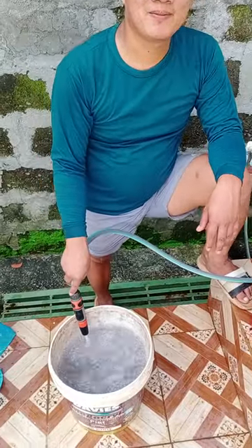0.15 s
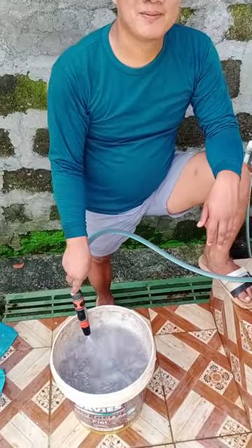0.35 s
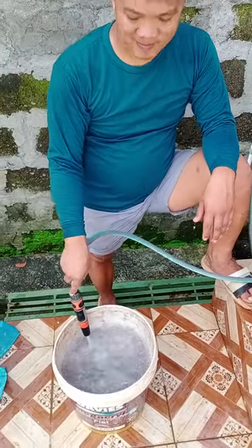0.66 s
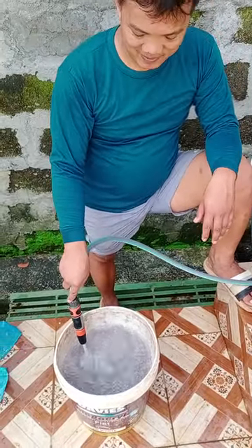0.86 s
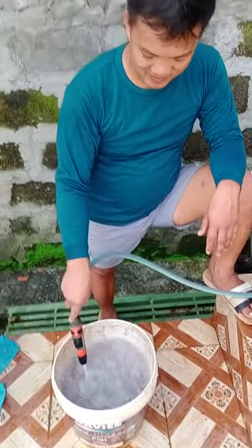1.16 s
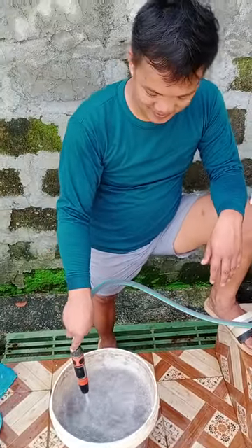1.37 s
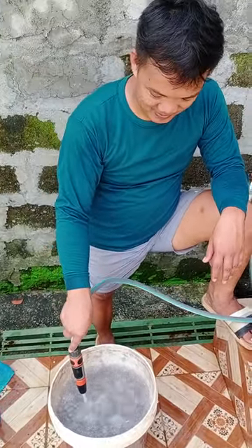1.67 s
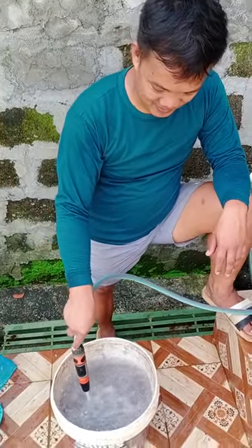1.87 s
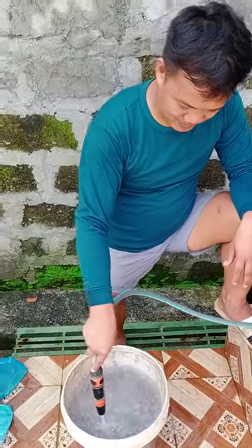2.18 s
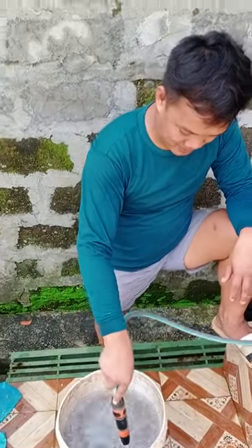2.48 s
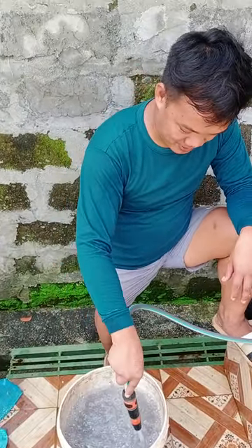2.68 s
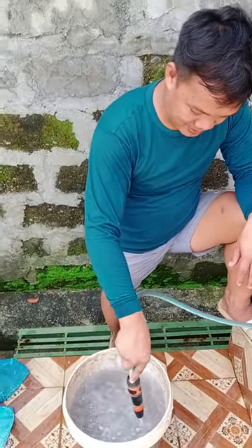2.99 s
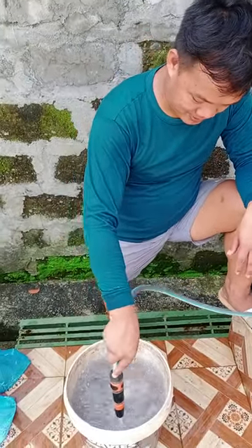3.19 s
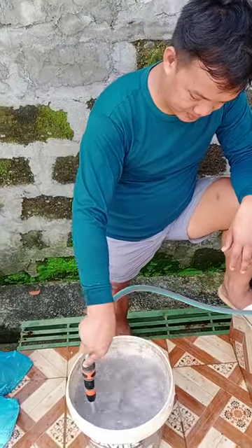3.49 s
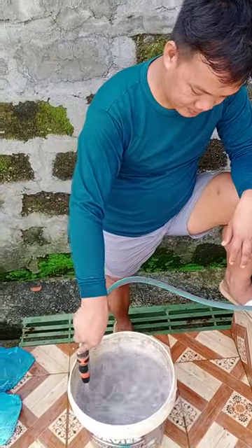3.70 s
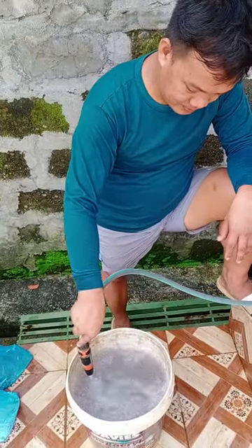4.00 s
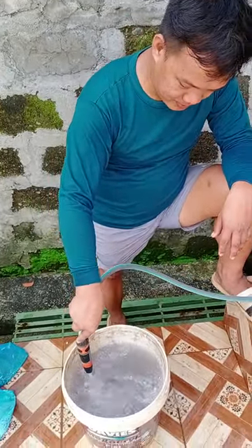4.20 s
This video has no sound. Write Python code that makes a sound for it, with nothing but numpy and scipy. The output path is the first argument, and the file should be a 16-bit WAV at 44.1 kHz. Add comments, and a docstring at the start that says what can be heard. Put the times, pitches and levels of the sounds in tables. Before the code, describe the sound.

For about 4.3 seconds a hose jet churns water in a plastic bucket, close and continuous. The main sound is a dense bright fizz, mostly from 2 to 6 kHz with airy mist above, flickering and crackling with tiny bubbles. It surges near 0.5 seconds, turns brighter and thinner from about 0.8, and surges again near 2.8. Beneath it, weaker frothy ringing around 1.2 to 1.6 kHz and a hollow bucket tone near 500 to 600 Hz gurgle unevenly, with froth strongest around 2.7. Soft low glugs rise at 0.26 and between 1.2 and 2.0. Sharp millisecond plinks dot the whole stretch, clearest at 1.8, 3.35, 3.84 and 4.29. A faint low wash lies underneath; a distant engine's low beating hum swells around 2.5 seconds, then fades. Outdoor tiled yard, hand-held mono microphone above, little reverberation, dull above 16 kHz. The water is still running at the end.

```python
"""Hose jet in a plastic bucket

A hose jet churns the water in a bucket on a tiled yard, heard from above by a hand-held mono microphone.
Noise and tiny ringing bubbles make the fizz; froth and the air in the bucket ring at a few pitches.
Single bubbles glug and plink as short rising tones, over a low wash of noise.
A far-away engine idles as four beating tones; both output channels are the same."""
import sys
import numpy as np
from scipy import signal
from scipy.io import wavfile
from scipy.ndimage import uniform_filter1d

SR = 44100
rng = np.random.default_rng(int(sys.argv[2]) if len(sys.argv) > 2 else 0)


def wav_out(sig):
    """Save sig, one row per channel (or a flat mono array), as 16-bit PCM at SR to the path in sys.argv[1]."""
    wavfile.write(sys.argv[1], SR, np.round(np.clip(np.atleast_2d(sig).T, -1, 1) * 32767).astype(np.int16))


N = 191333  # length in samples
EDGE_HZ = 15760  # upper limit of the sound


def gain_of(db):
    """Turns decibels into a factor."""
    return 10 ** (np.asarray(db) / 20)


def evened(x):
    """Scales to an rms (average strength) of 1."""
    return x / np.sqrt(np.mean(x ** 2) + 1e-20)


def read(points, hz):
    """Reads a spectrum table at any pitch, joining its points on a log-frequency axis."""
    f, value = np.transpose(points)
    return np.interp(np.log(hz + 1), np.log(f + 1), value)


def columns(rows, t):
    """Reads every column of a time table at times t, joining its points by straight lines."""
    s, *rest = np.transpose(rows)
    return [np.interp(t, s, c) for c in rest]


def wander(t, long_s):
    """Slow random drift of rms 1 at times t."""
    size = max(1, round(long_s / (t[1] - t[0])))
    noise = rng.standard_normal(len(t))
    return evened(uniform_filter1d(uniform_filter1d(noise, size), size))


def add(mix, s, sound):
    """Mixes a sound in at s seconds."""
    part = mix[round(s * SR):][:len(sound)]
    part += sound[:len(part)]


def peak_db(hz, centre_hz, width_hz):
    """A resonance curve: 0 dB at the centre, falling on both sides."""
    return -10 * np.log10(1 + (2 * (hz - centre_hz) / width_hz) ** 2)


def band(colour_db, level_db):
    """Power at each pitch with this colour, adding up to the level."""
    power = gain_of(colour_db) ** 2
    return power / power.mean(0) * gain_of(level_db) ** 2


def bubbles(low_hz, high_hz, per_s, cycles, spread_db, count):
    """Short rising rings of many sizes, each size on its own random train; equal power per Hz."""
    out = np.zeros(N)
    for hz in np.geomspace(low_hz, high_hz, count):
        turn = np.arange(int(4 * cycles * SR / hz)) * hz / SR
        swell = turn / (turn + 2.3) * np.exp(-turn / cycles)
        ring = swell * np.sin(2 * np.pi * turn * (1 + 0.00406 * turn))
        when, size = rng.random(N), rng.exponential(1, N)
        train = (when < per_s / count / SR) * gain_of(spread_db * np.minimum(size, 4))
        # the sizes are evenly spaced on a log axis, so higher ones must cover more Hz
        out += np.sqrt(hz) * evened(signal.oaconvolve(train, ring)[:N])
    return evened(out)


def shaped(x, field, size, patchy_db, flicker_db, wide_hz, long_s):
    """Colours x frame by frame with a field of power, drifting patches and a flicker common to all pitches."""
    hz, t, z = signal.stft(evened(x), SR, nperseg=size, noverlap=3 * size // 4)

    def span(value, step):
        return max(1, round(value / step))

    noise = rng.standard_normal(z.shape)
    patches = uniform_filter1d(noise, span(wide_hz, hz[1]), axis=0)
    patches = uniform_filter1d(patches, span(long_s, t[1]), axis=1)
    flicker = uniform_filter1d(rng.standard_normal(len(t)), span(0.013, t[1]))
    flicker = flicker - uniform_filter1d(flicker, span(0.09, t[1]))  # keeps only the quick part
    chance = gain_of(patchy_db * evened(patches) + flicker_db * evened(flicker))
    z = z * np.sqrt(field(hz[:, None], t)) * evened(chance)
    return signal.istft(z, SR, nperseg=size, noverlap=3 * size // 4)[1][:N]


def fizz():
    """Hiss, crackle and thousands of tiny bubbles; the microphone's aim shifts the valleys in their colour."""
    # the jet's surges: start_s, level_db, ring_db (3.5 kHz ring; only its departure from the mean counts)
    jet = [(0.0, -27, 0), (0.04, -25.5, -3.5), (0.52, -21, -5.5), (0.6, -28, -7.5), (0.88, -27.5, -4),
           (0.93, -24, -3.5), (1.13, -25.5, -9.5), (1.17, -24, -4), (1.59, -27.5, -4.5),
           (2.07, -25.5, -6.5), (2.11, -29.5, -9), (2.27, -27.5, -7), (2.51, -27.5, -8.5), (2.79, -22, -2),
           (2.81, -27, -6.5), (3.14, -26.5, -7.5), (3.16, -29.5, -8), (3.3, -25.5, -5), (3.87, -26, -4.5),
           (4.19, -27, -7.5), (4.24, -26, -0.5), (4.34, -27.5, -3)]
    # colour of the fizz at aim 0, 1 and 2, one table each: pitch_hz, power_db (per Hz, relative)
    aim_colours = [
        [(1120, -66), (1900, -29), (2040, -8), (2210, -24), (2570, -10.5), (2980, 4), (3850, -11), (4440, 1),
         (5200, -13), (5630, -6), (6210, -7), (10100, -29), (12000, -16.5), (14400, -16), (15700, -15)],
        [(1120, -42), (1900, -9), (2060, -16), (2250, -15.5), (2480, -15), (2750, -7), (2980, -2.5), (3920, -4),
         (4520, -1), (5300, -7), (5890, -3.5), (7470, -8.5), (10500, -27.5), (12900, 6), (15700, 15)],
        [(1120, -46), (1900, -10), (2190, -13), (2330, -14.5), (3030, 3), (3920, -8.5), (4760, 1.5),
         (5730, -14), (6660, -14), (7540, -17), (8530, -33), (9320, -38), (11700, -26), (14100, -5),
         (15700, -7)],
    ]
    # where the microphone points: start_s, aim (0 level to 2 tipped down)
    aim_path = [(0, 0.28), (.55, 0.17), (.8, 1.38), (1.3, 1.19), (1.6, 1.23), (2, 1.46), (2.5, 1.34),
                (3, 1.67), (3.45, 1.3), (3.7, 1.27), (4.05, 1.45), (4.34, 0.31)]
    # finest mist, the top treble: start_s, level_db
    spray = [(0.0, -36.5), (0.25, -34), (0.91, -40.5), (1.21, -37.5), (1.86, -37.5), (1.99, -33),
             (2.48, -39), (2.78, -35), (3.2, -38), (3.5, -32.5), (3.65, -40), (4.34, -39)]
    ring_trade = 0.99  # what the 3.5 kHz ring gains, the 4.4 kHz ring loses
    split_hz = 10300  # bubbles below, mist above

    def field(hz, t):
        fizz_db, ring_db = columns(jet, t)
        aim = np.clip(columns(aim_path, t)[0], 0, 2)
        # blend the two nearest aims
        colour_db = sum(np.maximum(1 - abs(aim - k), 0) * read(c, hz) for k, c in enumerate(aim_colours))
        colour_db = colour_db - 80 * np.log10(np.maximum(2000 / (hz + 1), 1))  # little below 2 kHz
        trade = gain_of(2 * peak_db(hz, 3460, 600)) - gain_of(2 * peak_db(hz, 4430, 800))
        colour_db = colour_db + ring_trade * (ring_db - ring_db.mean()) * trade
        # surges feed the larger bubbles most: the treble follows them less
        colour_db = colour_db - 0.23 * (fizz_db - fizz_db.mean()) / (1 + (5500 / (hz + 1)) ** 6)
        mist_db = -10 * np.log10(1 + (split_hz / (hz + 1)) ** 20) - 99 * (hz > 1.02 * EDGE_HZ)
        bubbly_db = -10 * np.log10(1 + (hz / split_hz) ** 20)
        mist_level_db = columns(spray, t)[0]
        return band(colour_db + bubbly_db, fizz_db) + band(colour_db + mist_db, mist_level_db)

    clicks = (rng.random(N) < 900 / SR) * rng.standard_normal(N)  # about 900 per second
    crackle = clicks * gain_of(2.8 * np.minimum(rng.exponential(1, N), 2))
    tiny = bubbles(1993, 15900, per_s=5000, cycles=1.93, spread_db=4.2, count=24)
    drive = 1.07 * rng.standard_normal(N) + 0.5 * tiny + 0.46 * evened(crackle)
    flickering = shaped(drive, lambda hz, t: 1, size=128, patchy_db=1.28, flicker_db=0.45,
                        wide_hz=1500, long_s=0.027)
    # echoes off the bucket wall and tiles cut narrow, lasting stripes that fade in the treble
    hz = np.fft.rfftfreq(1024, 1 / SR)[:, None]
    striped_db = 2.2 / (1 + (hz / 11000) ** 4)
    return shaped(flickering, field, size=1024, patchy_db=striped_db, flicker_db=-0.5,
                  wide_hz=152.4, long_s=0.2)


def froth():
    """Millimetre bubbles ring two cross modes of the bucket; the lower pitch shifts as the jet wanders."""
    # froth under the jet: start_s, low_mode_db, low_mode_pitch_hz, high_mode_db
    modes = [(0.0, -51, 1050, -47), (0.07, -47, 1260, -39.5), (0.12, -51, 1320, -44),
             (0.51, -41.5, 1250, -38.5), (0.76, -55.5, 1323, -53), (0.81, -54, 1400, -38.5),
             (1.45, -49.5, 1360, -47), (1.52, -61, 1220, -49.5), (1.94, -63, 1370, -45.5),
             (1.99, -51, 1130, -42), (2.14, -58.5, 1440, -43), (2.5, -41, 1040, -39.5),
             (2.63, -42.5, 1360, -38), (2.73, -32.5, 1220, -40), (2.86, -41.5, 1380, -48),
             (3.15, -44.5, 1326, -40), (3.25, -46.5, 1110, -45.5), (3.3, -53, 1420, -47.5),
             (3.54, -37, 1350, -37), (3.59, -42, 1395, -58), (4.11, -47, 1435, -51), (4.31, -56, 1390, -66),
             (4.34, -53, 1340, -55)]
    # colour given by the walls, before it is softened below: pitch_hz, power_db (per Hz, relative)
    wall_colour = [(410, -53), (700, -14), (833, -9.5), (934, 3), (1360, -13.5), (1740, 0), (2130, 13.5),
                   (2300, 16), (2990, -52), (5060, -120)]

    def field(hz, t):
        low_db, low_hz, high_db = columns(modes, t)
        walls_db = 0.65 * read(wall_colour, hz) - 90 * np.log10(np.maximum(hz / 1950, 1))
        # factors above 1 make the sides of a mode steeper
        low = band(walls_db + 1.71 * peak_db(hz, low_hz, 135), low_db)
        high = band(walls_db + 1.69 * peak_db(hz, 1587, 350), high_db)
        return low + high

    small = bubbles(692, 2474, per_s=600, cycles=16.4, spread_db=5.9, count=14)
    drive = 1.14 * rng.standard_normal(N) + 0.23 * small
    return shaped(drive, field, size=1024, patchy_db=4.5, flicker_db=0.3, wide_hz=90, long_s=0.25)


def bucket():
    """The churning rings the air over the water: two close, steep-sided modes that swap strength."""
    # air inside the bucket: start_s, level_db (before each mode's offset), lead_db (low mode over high)
    air = [(0.0, -44, 3), (0.08, -41, 2), (0.19, -56.5, 0), (0.39, -45, -3), (0.76, -53, 6.5),
           (0.88, -43.5, 1.5), (1.18, -46, 0.5), (1.27, -36, -1), (1.67, -58.5, -8), (1.71, -42.5, 4),
           (1.76, -56, 4), (1.82, -39.5, 1), (2.02, -42.5, -1), (2.08, -60, -6), (2.14, -45, -1),
           (2.33, -55, 4), (2.36, -44, 4.5), (2.66, -46, -3), (2.67, -36.5, -4), (2.83, -39.5, 3),
           (2.89, -45.5, 0), (3.21, -43, -4), (3.32, -52, -4), (3.54, -40, -3.5), (3.88, -59, -3),
           (4.34, -41, -0.5)]

    def field(hz, t):
        level_db, lead_db = columns(air, t)
        trade_db = lead_db / 2 + 3.5 * np.tanh(wander(t, 0.066))  # the modes also swap at random
        low_db = level_db - 4.5 + trade_db
        high_db = level_db - 2.5 - trade_db
        return band(2.2 * peak_db(hz, 515, 57), low_db) + band(1.89 * peak_db(hz, 608.0, 82), high_db)

    churning = bubbles(380.5, 811.7, per_s=150, cycles=9.9, spread_db=1.8, count=10)
    drive = 1.4 * rng.standard_normal(N) + 0.19 * churning
    return shaped(drive, field, size=1024, patchy_db=2.0, flicker_db=1.0, wide_hz=80, long_s=0.027)


def hollowed(x):
    """Echoes off the bucket wall and the tiles weaken wandering bands; a thin treble band rises and falls."""
    # band cancelled by an echo off the bucket wall: start_s, pitch_hz (before its wander), depth_db
    hollow_path = [(0, 2070, 31), (.3, 2100, 21), (.45, 1930, 6), (.57, 2040, 22), (.7, 2220, 18),
                   (.87, 2110, 15), (1.15, 2180, 29), (1.3, 2140, 7), (1.5, 2070, 17), (1.72, 2166, 23),
                   (2.1, 2060, 18), (2.43, 1950, 16), (2.6, 2290, 28), (2.75, 2220, 5), (2.9, 2150, 14),
                   (3.3, 2050, 16), (3.5, 2200, 6), (4.34, 2180, 11)]
    # thin treble band that drifts, at first slightly lifted, later weakened:
    # start_s, pitch_hz, depth_db (below 0 lifts it)
    treble_path = [(0, 10000, -6), (1, 11300, 1), (1.6, 9300, 4), (2.4, 9300, 3), (3.3, 9460, 17),
                   (4, 9500, 20), (4.34, 9940, 10)]
    hz, t, z = signal.stft(x, SR, nperseg=1024, noverlap=768)
    hz = hz[:, None]
    hollow_hz, hollow_db = columns(hollow_path, t)
    hollow_hz = hollow_hz + 40.6 * wander(t, 0.05)
    hollow = hollow_hz, hollow_db, 190
    treble = *columns(treble_path, t), 260
    for centre_hz, depth_db, width_hz in (hollow, treble):
        z = z * gain_of(-depth_db * np.exp(-((hz - centre_hz) / width_hz) ** 2))

    # many weak echoes of drifting delay add up to a random comb with narrow, deep gaps
    def drift():
        noise = uniform_filter1d(rng.standard_normal(z.shape), size=2, axis=0)
        return evened(uniform_filter1d(noise, size=40, axis=1))

    echoes = drift() + 1j * drift()
    strength = 0.5 / (1 + (hz / 7000) ** 2)  # weaker in the treble
    z = z * abs(1 + strength * echoes) / np.sqrt(1 + 2 * strength ** 2)
    return signal.istft(z, SR, nperseg=1024, noverlap=768)[1][:N]


def wash():
    """Low slosh and distant yard noise: random noise given a dull colour."""
    # colour of the wash: pitch_hz, power_db (per Hz, relative)
    dull_colour = [(12, -62), (20, -25), (129, -4), (188, -7.5), (249, -2), (368, -8.5), (528, -14),
                   (622, -2), (757, -32), (1000, -4), (1300, -59), (2200, -120)]

    def field(hz, t):
        return band(read(dull_colour, hz), -56.5)

    return shaped(rng.standard_normal(N), field, size=2048, patchy_db=0.0, flicker_db=4.5,
                  wide_hz=100, long_s=0.14)


def engine():
    """Four neighbouring orders of the firing rate beat into a throb; each wavers and fades a little."""
    # loudness and tone: start_s, level_db (before fading), strongest_order (multiple of the firing rate)
    idle = [(0, -59.5, 5.2), (.3, -61.5, 5.5), (.7, -65, 5.3), (.85, -55, 6.1), (.95, -63, 6),
            (1.05, -56.5, 6.1), (1.2, -64, 5.3), (1.45, -61, 6), (1.68, -62, 5), (2.05, -56.5, 4.3),
            (2.3, -53.5, 4.4), (2.39, -49.5, 5), (2.46, -39.5, 5.4), (2.58, -37, 5.3), (2.78, -60, 5.1),
            (2.89, -52, 4.9), (3.1, -63.5, 5.8), (3.35, -46, 5.1), (3.6, -67, 5.3), (3.73, -51, 5.4),
            (4, -60, 5.6), (4.22, -49.5, 5), (4.34, -50, 5.4)]
    # engine speed: start_s, firing_rate_hz
    firing = [(0, 24.1), (.3, 23.6), (1.7, 23.66), (2, 23.18), (2.6, 23.4), (3.6, 22.7), (4.34, 23)]
    fall_db, fade_db = 11, 1.5  # fall away from the strongest order; random fading of each order
    t = np.arange(N) / SR
    level_db, strongest = columns(idle, t)
    turns = np.cumsum(columns(firing, t)[0]) / SR
    out = np.zeros(N)
    for order in range(4, 8):
        away = order - strongest
        db = level_db - fall_db * away ** 2 / (1 + 0.43 * abs(away)) + fade_db * wander(t, 0.078)
        phase = order * turns + 0.05 * wander(t, 0.1)  # in whole turns
        out += np.sqrt(2) * gain_of(db) * np.cos(2 * np.pi * phase)
    return out


def glugs():
    """Large single bubbles: soft low tones that swell, die away and rise a little in pitch."""
    # large bubbles: start_s, peak_db, pitch_hz (at the start), t60_s (time to fall by 60 dB)
    large = [(0.258, -45.5, 313, 0.12), (1.246, -44, 446, 0.15), (1.358, -46, 312, 0.12),
             (1.519, -49.5, 291, 0.19), (1.799, -46, 405, 0.13), (1.838, -36, 412, 0.057),
             (2.002, -48, 304, 0.1)]
    out, t = np.zeros(N), np.arange(SR // 4) / SR
    for s, db, hz, t60 in large:
        swell = gain_of(-60 * t / t60) * (1 - np.exp(-t / 0.016))
        tone = np.sin(2 * np.pi * hz * t * (1 + 0.65 * t))
        add(out, s, gain_of(db) * swell / swell.max() * tone)
    return out


def plinks():
    """Single bubbles that stand out: sharp high tones a few milliseconds long, rising a little."""
    # sharp bubbles: start_s, peak_db, pitch_hz (at the start)
    sharp = [(0.4604, -16, 2860), (0.7967, -16.5, 4220), (1.113, -15.5, 4540), (1.72, -22, 4570),
             (1.7797, -17, 4640), (1.8136, -14, 3100), (1.946, -19, 4300), (2.5972, -26, 2940),
             (2.7569, -18, 3220), (3.272, -20, 2940), (3.354, -14, 3200), (3.6474, -25, 4720),
             (3.8371, -10.5, 4600), (3.9727, -14, 4370), (4.208, -19.5, 3300), (4.2901, -11, 3020)]
    out, t = np.zeros(N), np.arange(SR // 4) / SR
    for s, db, hz in sharp:
        swell = np.exp(-((t - 0.0016) / 0.0008) ** 2)
        add(out, s, gain_of(db) * swell * np.sin(2 * np.pi * hz * t * (1 + 8 * t)))
    return out


def scene():
    """All sources reach one microphone capsule, copied to two channels."""
    water = hollowed(fizz() + froth() + bucket())
    mono = water + wash() + engine() + glugs() + plinks()
    return np.tile(mono, (2, 1))


def record(dry):
    """A steep low-pass filter removes everything above the upper limit."""
    low_pass = signal.firwin(1023, EDGE_HZ, window=("kaiser", 10), fs=SR)
    return signal.oaconvolve(dry, low_pass[None], "same")


dry = scene()
out = record(dry)
wav_out(out)
```